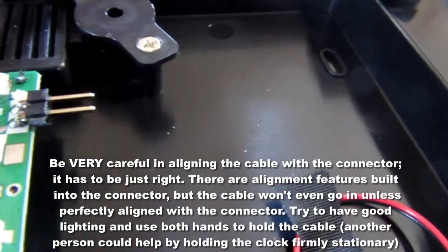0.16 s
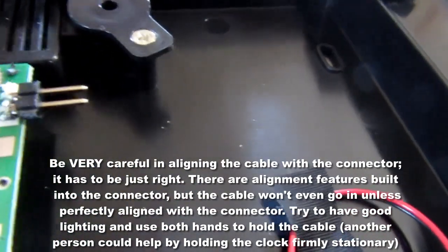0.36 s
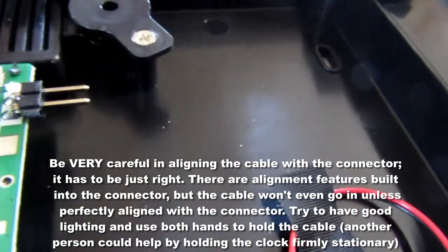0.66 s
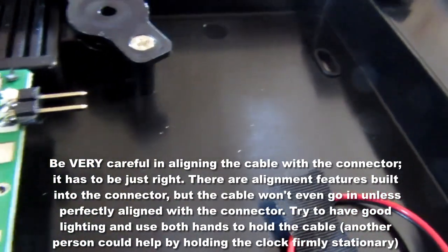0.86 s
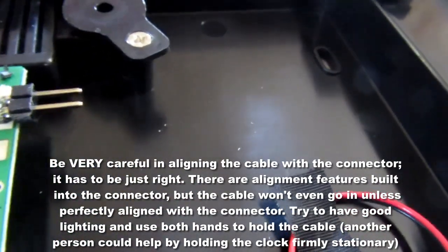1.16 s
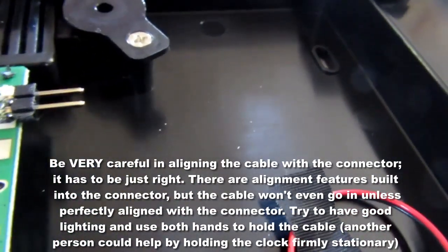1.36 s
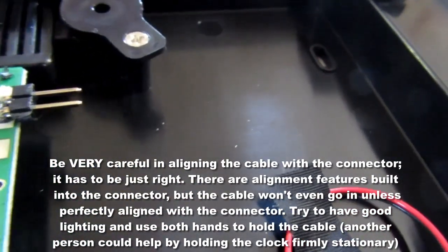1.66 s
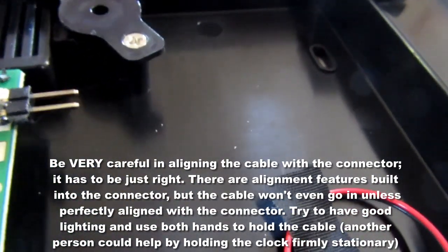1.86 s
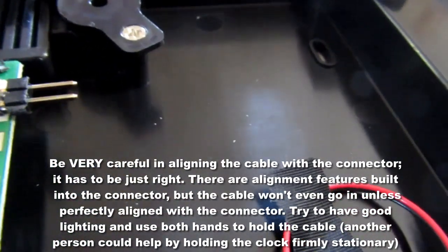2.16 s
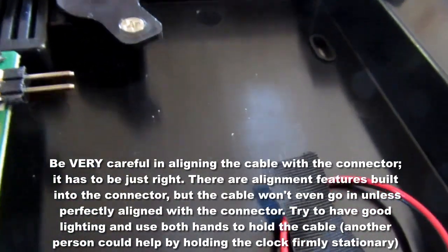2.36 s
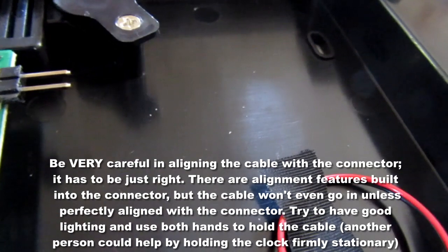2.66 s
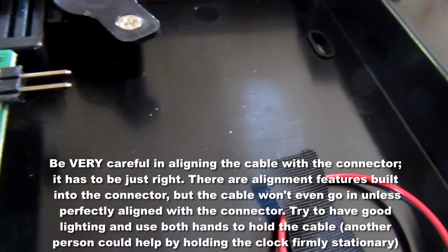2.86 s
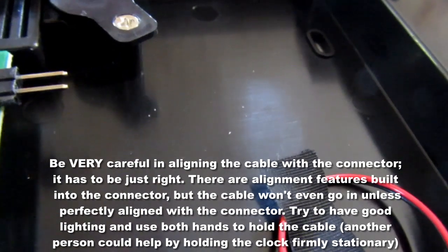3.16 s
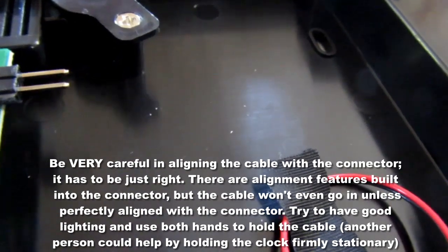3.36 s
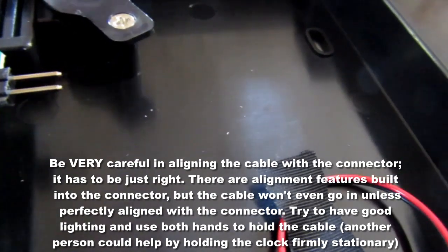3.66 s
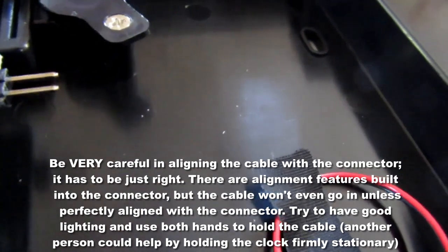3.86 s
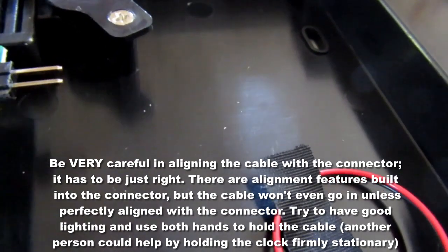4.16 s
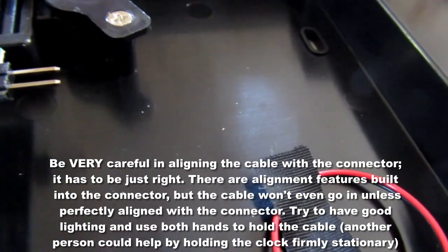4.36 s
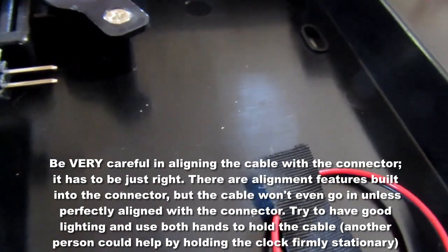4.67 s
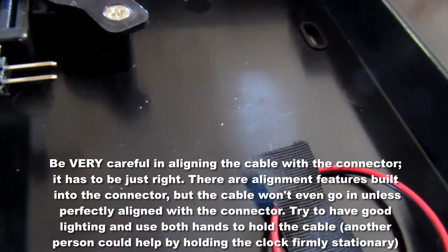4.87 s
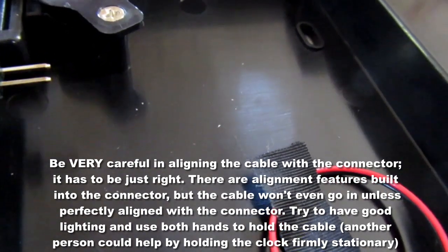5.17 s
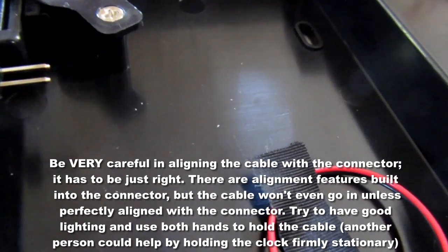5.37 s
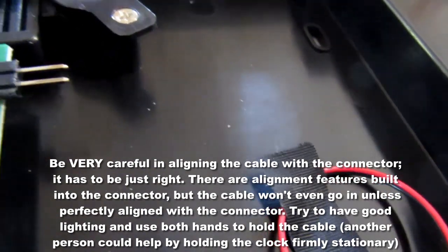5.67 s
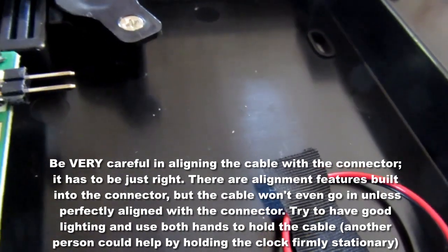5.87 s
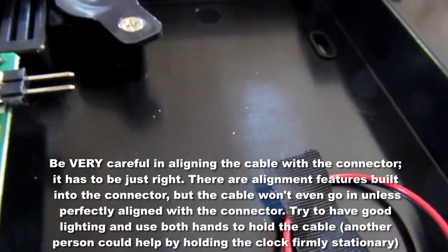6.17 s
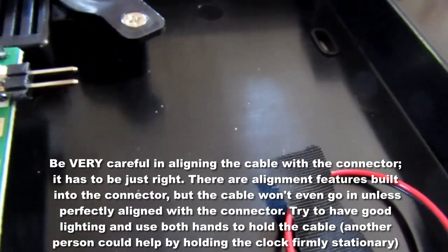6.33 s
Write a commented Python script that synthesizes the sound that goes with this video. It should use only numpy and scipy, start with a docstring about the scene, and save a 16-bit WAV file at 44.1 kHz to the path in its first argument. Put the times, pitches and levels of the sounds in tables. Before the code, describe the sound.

A ribbon cable ticks, scrapes and snaps against a plastic case, with a few sharp knocks over a low ventilation rumble.

```python
"""Ribbon cable against a plastic case

Close to a camera, fingers work a ribbon cable against a plastic case. Short impulses excite resonances
as the ribs tick and snap; friction makes the cable scrape, chirp and faintly squeal; knocks ring the
lid and the bench. A ventilated room rumbles behind, and gain control ducks after the loudest snaps."""
import sys
import numpy as np
from scipy import signal
from scipy.fft import rfft, irfft, next_fast_len
from scipy.io import wavfile
from scipy.ndimage import uniform_filter1d, map_coordinates

SR = 44100
rng = np.random.default_rng(int(sys.argv[2]) if len(sys.argv) > 2 else 0)


def wav_out(sig):
    """Save sig, one row per channel (or a flat mono array), as 16-bit PCM at SR to the path in sys.argv[1]."""
    wavfile.write(sys.argv[1], SR, np.round(np.clip(np.atleast_2d(sig).T, -1, 1) * 32767).astype(np.int16))


N = 286650

# Resonances of the cable's ribs, the edge and the case: centre_hz, width_hz, gain_db
RIB_MODES = [(7330, 3040, -4), (8310, 340, 2.5), (9550, 2700, -7.5), (11740, 650, 4), (12330, 1940, -2.5)]
EDGE_MODES = [(4570, 820, 3.5), (5160, 270, 8), (5654, 810, 4.5)]
CASE_MODES = [(1607, 150, 2.5), (2312, 184, 3), (2846, 203, 2.5), (3520, 580, 2.5)]
# Contour of the holding fingers' faint rustle: time_s, level_db
FINGER_RUSTLE = [(0.0, -51.5), (0.3, -49), (0.61, -56.5), (1.45, -52), (2.85, -67), (3.04, -52.5),
                 (3.95, -59), (5.25, -54), (5.72, -53), (6.5, -63)]


def amp(db):
    """Amplitude ratio of a level in decibels."""
    return 10 ** (np.asarray(db) / 20)


def unit(x):
    """Normalisation to an rms of 1."""
    return x / np.sqrt(np.mean(abs(x) ** 2) + 1e-20)


def along(points, hz):
    """Interpolation of (frequency_hz, value) points on a logarithmic frequency axis."""
    point_hz, values = np.transpose(points)
    return np.interp(np.log(hz + 1), np.log(point_hz + 1), values)


def curves(rows):
    """Linear interpolation: one value per sample for each column after the time."""
    time_s, *columns = np.transpose(rows)
    return [np.interp(np.arange(N) / SR, time_s, column) for column in columns]


def wobble(knots_per_s):
    """Smooth random modulation: a spline through Gaussian knots."""
    knots = rng.standard_normal(int(N * knots_per_s / SR) + 4)
    return map_coordinates(knots, [np.arange(N) * knots_per_s / SR])


def filtered(x, response):
    """Linear filtering: the spectrum of x times a complex frequency response."""
    size = next_fast_len(N + SR // 2)
    return irfft(rfft(x, size) * response(np.fft.rfftfreq(size, 1 / SR)), size)[..., :N]


def modal_response(hz, modes):
    """Modal superposition at unit power gain; one wide resonance over all steepens the skirts."""
    def resonance(centre, width):
        return 1j * hz * width / (centre * centre - hz * hz + 1j * hz * width)
    low, high = modes[0][0], modes[-1][0]
    peaks = sum((-1) ** k * amp(db) * resonance(centre, width)
                for k, (centre, width, db) in enumerate(modes))
    return unit(resonance(np.sqrt(low * high), high - low) * peaks)


def resonate(force, modes):
    """Forced vibration: a body's resonances colour the force that drives it."""
    return filtered(force, lambda hz: modal_response(hz, modes))


def noise(spectrum):
    """Spectral shaping: white noise is coloured and brought to an rms of 1."""
    return unit(filtered(rng.standard_normal(N), lambda hz: amp(along(spectrum, hz))))


def background():
    """Independent sources add in power: ventilation, handling rumble, mains hum and microphone hiss."""
    # Spectral densities of ventilation and hiss: frequency_hz, relative_db
    air_spectrum = [(12, -45), (20, -12.5), (65, -13), (92, -15.5), (107, -10), (170, -4), (264, -10.5),
                    (374, -5), (540, -10.5), (617, -13.5), (734, -10), (890, -7), (1250, -8), (1420, -18),
                    (2000, -20), (2600, -52.5), (4400, -120)]
    hiss_spectrum = [(880, -31), (1500, -1), (1820, -56), (2130, -6.5), (2410, -6), (2840, -5.5),
                     (3190, -12.5), (3590, -11.5), (3990, -15), (4310, -14), (4890, -13.5), (5440, -14),
                     (9000, -17), (9550, -15), (10100, -22), (15200, -31)]
    # Drift of the ventilation and swells of the rumble: time_s, relative_db
    air_drift = [(0, -0.5), (1, -1), (2, -1.5), (3, -1), (4.5, 0), (5.5, -4), (6.5, 1)]
    rumble_swells = [(0.0, -44.5), (0.5, -49.5), (.85, -44.5), (1.1, -43.5), (1.39, -52.5), (2.15, -54),
                     (2.5, -48), (2.85, -48.5), (3.08, -41.5), (3.45, -56), (4.44, -49), (5.7, -48),
                     (6.5, -50)]
    # Mains tone: pitch_hz, relative_db
    hum_tones = [(120, -64.5)]
    rumble_modes = [(240.4, 59, 1.0), (286.7, 69, 2), (407, 240, -4.0)]  # centre_hz, width_hz, gain_db
    air = amp(-44.5 + curves(air_drift)[0] + 0.2 * wobble(2.16)) * noise(air_spectrum)
    rumble_db = curves(rumble_swells)[0] - 2 + 2 * wobble(11)
    rumble = amp(rumble_db) * unit(resonate(rng.standard_normal(N), rumble_modes))
    hum = sum(amp(db + 2.5) * np.sin(2 * np.pi * hz * np.arange(N) / SR) for hz, db in hum_tones)
    return air + rumble + hum + amp(-56.5) * noise(hiss_spectrum)


def reverberation(x):
    """Diffuse decay: each frequency dies at its own rate; random phases keep the tail from ringing."""
    # Reverberation time of the room: frequency_hz, t60_s
    decay_times = [(300, 0.47), (3000, 0.48), (12000, 0.26)]
    # Colour of the wall reflections: frequency_hz, gain_db
    wall_colour = [(300, 1.5), (3000, -2), (12000, -7)]
    hz, t, spectra = signal.stft(rng.standard_normal(SR // 2), SR, nperseg=256)
    tail_db = along(wall_colour, hz)[:, None] - 60 * t / along(decay_times, hz)[:, None]
    tail = signal.istft(spectra * amp(tail_db), SR, nperseg=256)[1]
    reflections = signal.fftconvolve(np.pad(x, (350, 0)), tail / np.linalg.norm(tail))
    wet = signal.stft(reflections, nperseg=192)[2]
    return signal.istft(wet * np.exp(2j * np.pi * rng.random(wet.shape)), nperseg=192)[1][:N]


def squeal():
    """Stick-slip friction: rubbed plastic drives two high resonances, periodically or, if rough, as noise."""
    # Course of the rubbing: time_s, slip_rate_hz, level_db, roughness (0 to 1)
    rubbing = [(2.14, 800, -95, 0), (2.2, 880, -76, 0), (2.25, 1045, -73, 0), (2.3, 1300, -72, 0),
               (2.35, 1190, -76, 0), (2.41, 1092, -70, 0), (2.445, 1015, -70, 0), (2.5, 955, -74, 0),
               (2.535, 1085, -69, 0), (2.58, 1200, -78, 0), (2.62, 1090, -70, 0), (2.66, 850, -75, 0),
               (2.69, 750, -95, 0), (2.84, 900, -95, 1), (2.88, 900, -66, 1), (3.15, 900, -67, 1),
               (3.22, 900, -95, 1), (6.36, 1060, -95, 0), (6.41, 1080, -74, 0), (6.5, 1140, -71, 0)]
    # Resonances of the plastic, applied twice: centre_hz, width_hz, gain_db
    plastic_modes = [(11150, 400, 3), (13800, 650, 0)]
    slip_hz, db, roughness = curves(rubbing)
    cycles = np.cumsum(uniform_filter1d(slip_hz, size=1300)) / SR
    harmonics = unit(sum(amp(6 * wobble(18)) * np.cos(2 * np.pi * k * cycles) for k in range(8, 19)))
    force = amp(db + 2 * wobble(40)) * ((1 - roughness) * harmonics + roughness * rng.standard_normal(N))
    return filtered(force, lambda hz: unit(modal_response(hz, plastic_modes) ** 2))


def chirps():
    """Narrow-band noise: where a stroke catches, one wavering pitch swells under a Gaussian envelope."""
    # Catches of the cable: peak_s, length_s, pitch_hz, width_hz, level_db
    catches = [(.053, 0.055, 2740, 170, -51), (.24, 0.065, 2730, 170, -52.5),
               (1.124, 0.047, 5200, 500, -43.5), (1.42, 0.053, 5400, 300, -52.5),
               (1.857, 0.028, 2960, 90, -52), (2.406, 0.024, 2680, 300, -56.5),
               (2.92, 0.12, 2910, 120, -67), (3.243, 0.02, 3610, 200, -46), (4.128, 0.027, 5350, 600, -37),
               (4.35, 0.017, 5500, 500, -44), (4.43, 0.022, 5350, 600, -38), (4.685, .06, 2930, 89, -57),
               (4.785, 0.05, 2920, 80, -44.5), (4.9, .04, 2940, 90, -61), (4.995, .03, 3000, 90, -56),
               (5.088, 0.032, 3830, 120, -44), (5.955, 0.046, 2900, 100, -45), (5.987, .05, 5240, 600, -44)]
    out, t = np.zeros(N + SR), np.arange(-SR // 10, SR // 10) / SR
    for peak_s, length_s, hz, width_hz, db in catches:
        complex_noise = [1, 1j] @ rng.standard_normal((2, len(t)))
        waver = unit(signal.lfilter([1], [1, -np.exp(-np.pi * width_hz / SR)], complex_noise))
        swell = amp(db + 6 - 43 * (t / length_s) ** 2)
        out[round(peak_s * SR):][:len(t)] += swell * (waver * np.exp(2j * np.pi * hz * t)).real
    return out[SR // 10:][:N]


def struck(blows, modes):
    """Free vibration: each blow starts damped modes; loose parts make their level and phase flutter."""
    out, t = np.zeros(N + SR), np.arange(SR // 5) / SR
    def flutter():
        return map_coordinates(rng.standard_normal(64), [t * 220])
    for start_s, db in blows:
        ring = sum(amp(gain_db + 2.2 * flutter() - 60 * t / t60_s)
                   * np.sin(2 * np.pi * hz * t + .45 * flutter()) for hz, gain_db, t60_s in modes)
        out[round(start_s * SR):][:len(t)] += amp(db) * (1 - np.exp(-t / 0.00044)) * ring
    return out[:N]


def knocks():
    """Impact excitation: the hollow lid is knocked, and the case jolts on the bench."""
    # Blows on lid and bench: start_s, level_db
    lid_blows = [(6.0385, -25.5), (6.067, -32), (6.095, -32.5)]
    bench_blows = [(3.5545, -22.5), (4.106, -37.5), (5.51, -32), (5.984, -40)]
    # Their natural modes: pitch_hz, gain_db, t60_s
    lid_modes = [(394, 2, 0.034), (830, -4, 0.045), (1063, 0.5, 0.095), (1570, -2, 0.05), (2093, 1, 0.072),
                 (2300, -5.5, 0.05), (3010, -7, 0.044)]
    bench_modes = [(255, 6.5, 0.037), (720, -1.5, 0.051), (1100, -16, 0.053), (1440, -8.5, 0.054),
                   (1900, -7, 0.057), (2280, -18, 0.07)]
    return struck(lid_blows, lid_modes) + struck(bench_blows, bench_modes)


def body_levels(db, brightness_db, edge_db):
    """Spectral balance: ribs exceed case by brightness_db; the edge is edge_db from their mean."""
    ribs_db, case_db = db + min(brightness_db, 0), db - max(brightness_db, 0)
    return np.array([ribs_db, (ribs_db + case_db) / 2 + edge_db, case_db])


def moving_contact(x, depth_db=3.5):
    """Spectral modulation: as the contact moves, gain varies in patches of about 500 Hz by 50 ms."""
    spectra = signal.stft(x, nperseg=256)[2]
    patches = uniform_filter1d(rng.standard_normal(spectra.shape), size=3, axis=0)
    patches = uniform_filter1d(patches, size=17, axis=1)
    return signal.istft(spectra * unit(amp(depth_db * unit(patches))), nperseg=256)[1][:N]


def scrapes():
    """Sliding friction: uneven grit under the strokes and the fingers drives ribs, edge and case."""
    # Strokes of the cable: peak_s, length_s, level_db, brightness_db
    strokes = [(0.067, 0.099, -47, 7), (0.114, 0.042, -42.5, 5), (0.228, 0.053, -48.5, -3.5),
               (0.31, 0.071, -40.5, 10), (0.377, 0.029, -41.5, 4.5), (0.51, 0.022, -36, 9),
               (0.541, 0.054, -31, 9), (0.606, 0.12, -47.5, 9), (0.701, 0.041, -42.5, 13),
               (0.863, 0.086, -47.5, 8), (0.943, 0.12, -54, 4), (1.047, 0.068, -47, 7),
               (1.091, 0.041, -44, 6), (1.133, 0.031, -40.5, 16), (1.257, 0.096, -47.5, -4),
               (1.317, 0.06, -43.5, 6), (1.42, 0.071, -48.5, -1), (1.502, 0.07, -52.5, 0.5),
               (1.581, 0.064, -48.5, -4), (1.713, 0.063, -50, -3), (1.857, 0.028, -56, -3),
               (3.165, 0.05, -49, -9), (3.566, 0.096, -44, -8), (4.117, 0.019, -38, -1),
               (4.163, 0.021, -37.5, -24), (4.347, 0.018, -41.5, -1), (4.446, 0.06, -38.5, -5),
               (4.57, 0.041, -51.5, 3.5), (4.674, 0.07, -47, -4.5), (4.778, 0.076, -46.5, -3),
               (4.892, 0.082, -54.5, 2), (4.985, 0.044, -52.5, -7), (5.081, 0.048, -37, 5.5),
               (5.121, 0.039, -49.5, 3), (5.242, 0.13, -52, -2), (5.344, 0.065, -51.5, -7),
               (5.966, 0.034, -36.5, -5), (5.989, 0.04, -34.5, -14)]
    t, rise_share = np.arange(N) / SR, 0.43
    power = amp(curves(FINGER_RUSTLE)[0] + np.array([[-9], [-15], [-13]])) ** 2  # ribs, edge, case
    for peak_s, length_s, db, brightness_db in strokes:
        span = slice(max(round((peak_s - .2) * SR), 0), round((peak_s + .25) * SR))
        side_s = length_s * np.where(t[span] < peak_s, rise_share, 1 - rise_share)
        fade_db = 10 * ((t[span] - peak_s) / side_s) ** 2
        power[:, span] += amp(body_levels(db, brightness_db, edge_db=-4.5)[:, None] - fade_db) ** 2
    grit = unit(amp(2.5 * wobble(150) + 0.87 * wobble(610)))
    forces = np.sqrt(power) * grit * rng.standard_normal((3, N))
    return moving_contact(sum(map(resonate, forces, (RIB_MODES, EDGE_MODES, CASE_MODES))))


def stray_ticks(per_s=5.2):
    """Random impulses: rows for tiny ticks whose levels follow the finger rustle."""
    when, size, tone = rng.random((round(per_s * N / SR), 3)).T
    rustle_db = curves(FINGER_RUSTLE)[0][(when * N).astype(int)]
    return list(zip(when * N / SR, rustle_db - 6.5 - 4 * np.log(1 - size), 30 * (tone - .5)))


def ticks():
    """Transient excitation: short bursts ring ribs, edge, case and shell; louder ticks last longer."""
    # Ticks and snaps of the ribs: start_s, level_db, brightness_db
    snaps = [(0.1222, -36.5, -19), (0.2622, -46, 10), (0.3813, -29, 9), (0.446, -32, 18), (0.4686, -30, 12),
             (0.4752, -21.5, 14), (0.5127, -31, 10), (0.5513, -27, 8), (0.5938, -35, 15), (0.6126, -35, 24),
             (0.6845, -38, 27), (0.8322, -23.5, 24), (1.0736, -31, 6), (1.0816, -34, 6), (1.1, -28, 16),
             (1.1128, -34, 11), (1.126, -44, 8), (1.138, -40, 6), (1.699, -34, 14), (1.719, -44, 5),
             (1.729, -40, 10), (2.316, -46, 17), (2.398, -57, 0), (2.5826, -37, 24), (2.8, -39.5, 24),
             (2.8328, -39, 26), (2.868, -27.5, 7), (2.9636, -42.5, 0.5), (3.0165, -49, 8),
             (3.042, -43.5, 2), (3.058, -50, 2), (3.2418, -43, 0), (3.3346, -45.5, -20), (3.5534, -38, 18),
             (3.5554, -9.5, 14), (3.5612, -17.5, -2.5), (3.744, -42, -8), (3.781, -45, 0), (3.851, -47, 0),
             (3.8893, -20.5, -5), (4.0212, -26.5, 6), (4.1049, -30.5, 2), (4.111, -23, 12),
             (4.1222, -19, 11), (4.1324, -21, 10), (4.14, -28, -1), (4.158, -16.5, 16),
             (4.2756, -21.5, 12.5), (4.346, -32, 5), (4.3503, -33, 3), (4.37, -31.5, 4),
             (4.4219, -21.5, 10), (4.43, -22.5, 7.5), (4.436, -28, 17.5), (4.4426, -28, 7),
             (4.4644, -40, -2), (4.4856, -38, 7), (4.5048, -43, -10), (4.5137, -43, 8), (4.993, -46, 5),
             (5, -44, 14), (5.05, -45, 2), (5.038, -36.5, 13), (5.231, -38.5, 14), (5.287, -44.5, 13),
             (5.529, -39, 5), (5.51, -12, 4.5), (5.9657, -27.5, 4), (5.9806, -27, 8), (5.9867, -19.5, 10),
             (5.998, -25.5, 8), (6.005, -19.5, 9), (6.038, -32, -10), (6.0587, -36, -2), (6.0814, -40, -4),
             (6.1216, -43, -19), (6.173, -43.5, -12), (6.188, -47, -20)]
    # Dull resonances of the shell: centre_hz, width_hz, gain_db
    shell_modes = [(593, 550, -2), (1000, 350, 5), (1310, 570, -0.5)]
    # Relative length of the bursts on ribs, edge, case and shell: t60_ratio
    decay_ratios = [.6, .8, 1.2, 1.5]
    out, t = np.zeros(N + SR), np.arange(2048) / SR
    hz = np.fft.rfftfreq(len(t), 1 / SR)
    bodies = np.array([modal_response(hz, m) for m in (RIB_MODES, EDGE_MODES, CASE_MODES, shell_modes)])
    attack = 1 - np.exp(-t / 0.00046)
    crack = amp(14.5 - 60 * t / 0.0018)  # the sharp start of each burst
    for start_s, db, brightness_db in snaps + stray_ticks():
        t60_s = 0.014 * np.exp(.01 * (db + 30)) * np.c_[decay_ratios]
        bursts = (amp(-60 * t / t60_s) + crack) * attack * rng.standard_normal((4, len(t)))
        rings = irfft(rfft(bursts) * bodies)
        peak_rms = np.sqrt(uniform_filter1d(rings ** 2, size=66).max(axis=1))  # the loudest 1.5 ms
        levels_db = body_levels(db, brightness_db, edge_db=-1.5)
        shell_db = levels_db[-1] - 10.5
        out[round(start_s * SR):][:len(t)] += amp(np.append(levels_db, shell_db)) / peak_rms @ rings
    return out[:N]


def scene(cutoff_hz=166):
    """Superposition of all sources; the handling sounds and their reverberation fall away below the cutoff."""
    handling = ticks() + scrapes() + chirps() + knocks()
    in_room = handling + amp(-16.5) * reverberation(handling)
    radiated = filtered(in_room, lambda hz: (1j * hz / (cutoff_hz + 1j * hz)) ** 2)
    return (radiated + squeal() + background())[None]


def record(dry):
    """Automatic gain control: loud moments lower the gain, which creeps back; a band limit follows."""
    recovery_db_per_s, shelf_hz, top_hz = 5, 15050, 16441
    level_db = 10 * np.log10(abs(uniform_filter1d(dry[0] ** 2, size=176)) + 1e-12)
    wanted_db = np.clip(.45 * (level_db + 25), 0, 5.4)  # reduction begins above -25 dB
    creep_db = recovery_db_per_s * np.arange(N) / SR
    held_db = np.maximum.accumulate(wanted_db + creep_db) - creep_db
    duck_db = uniform_filter1d(held_db, size=2001, origin=1000)  # lag: a mean over the past 45 ms
    ducked = dry * amp(-duck_db)
    return filtered(ducked, lambda hz: (hz < top_hz) * (amp(-31) + 1 / (1 + (hz / shelf_hz) ** 150)))


dry = scene()
out = record(dry)
wav_out(out)
```